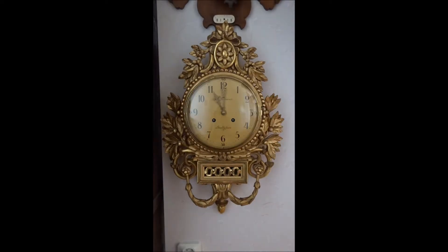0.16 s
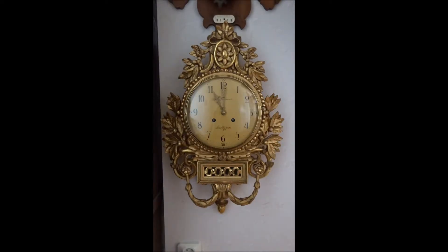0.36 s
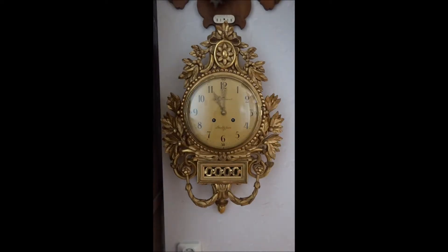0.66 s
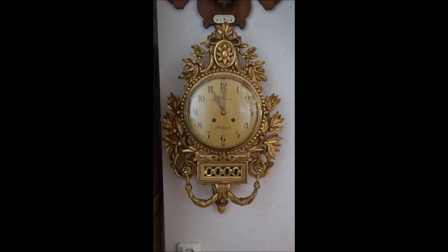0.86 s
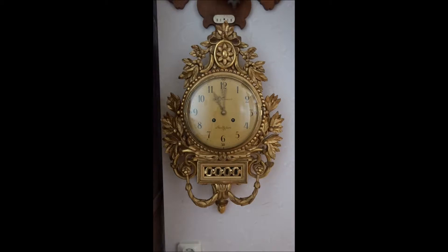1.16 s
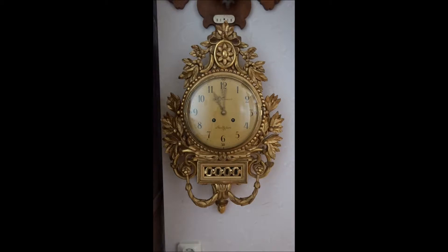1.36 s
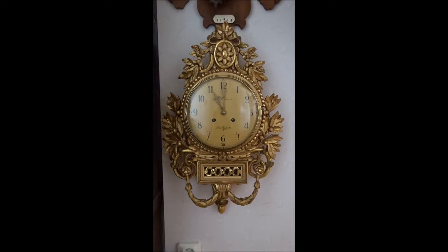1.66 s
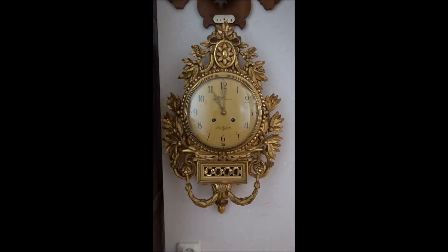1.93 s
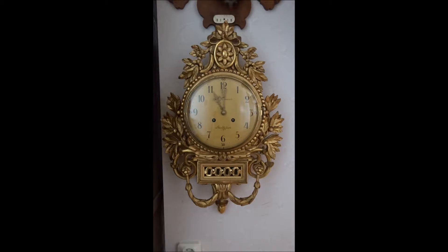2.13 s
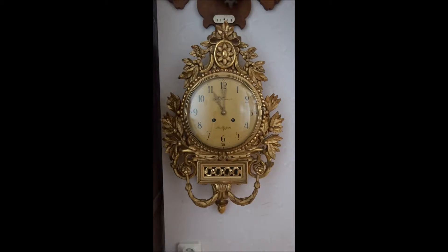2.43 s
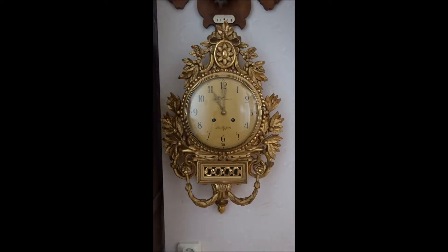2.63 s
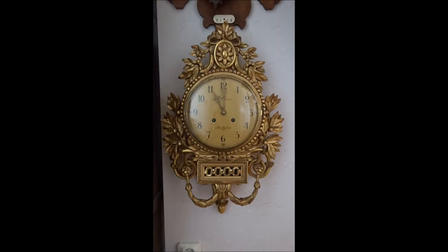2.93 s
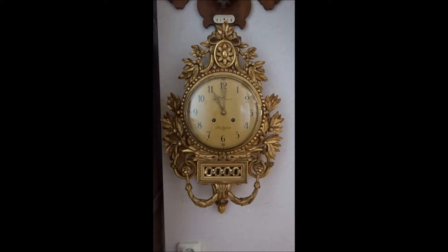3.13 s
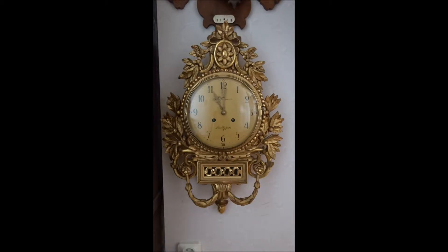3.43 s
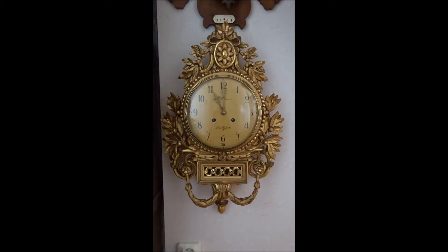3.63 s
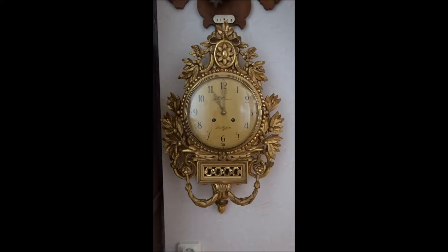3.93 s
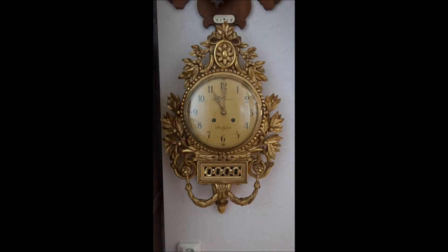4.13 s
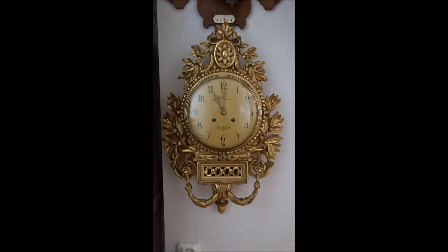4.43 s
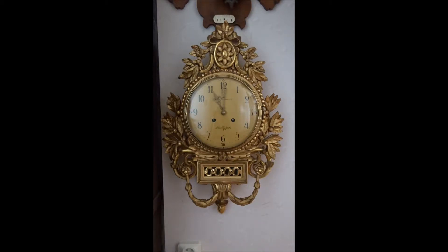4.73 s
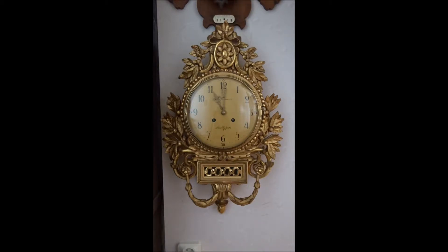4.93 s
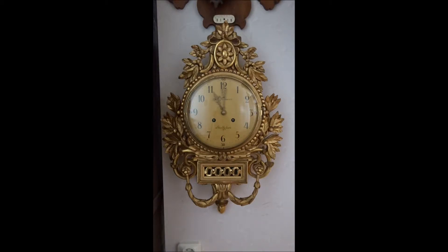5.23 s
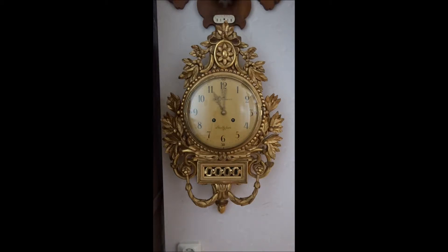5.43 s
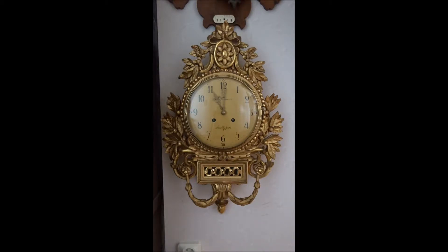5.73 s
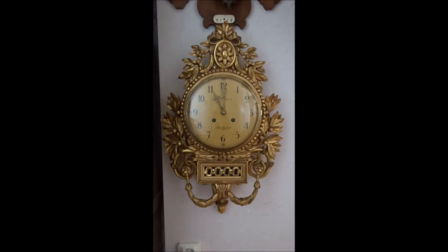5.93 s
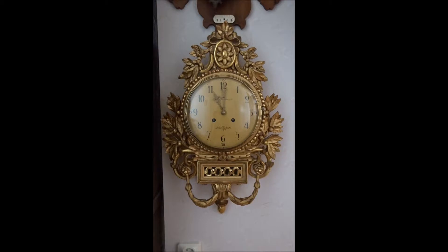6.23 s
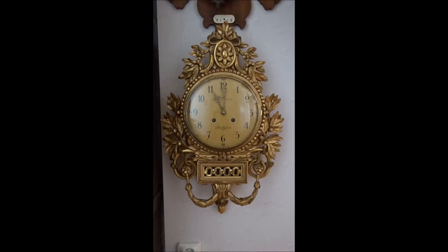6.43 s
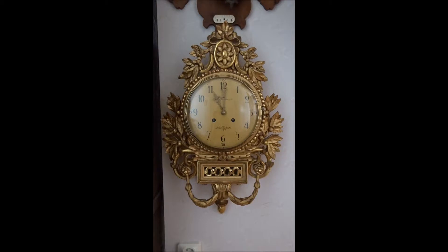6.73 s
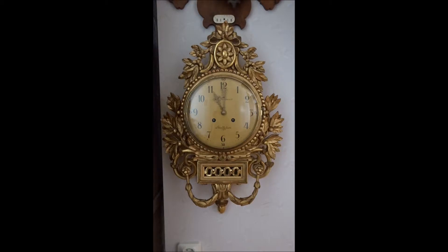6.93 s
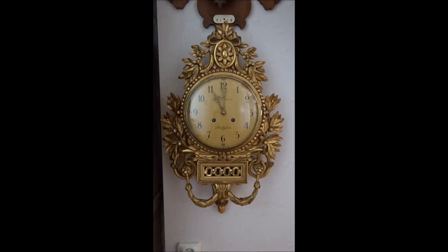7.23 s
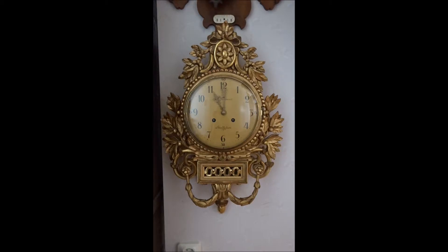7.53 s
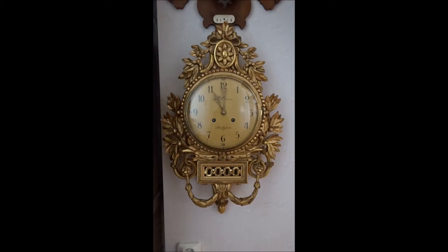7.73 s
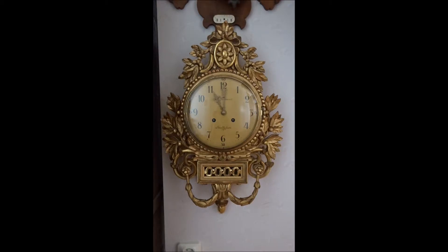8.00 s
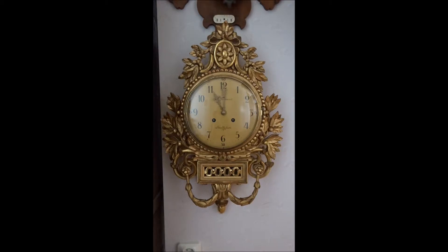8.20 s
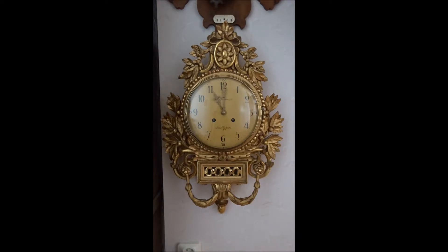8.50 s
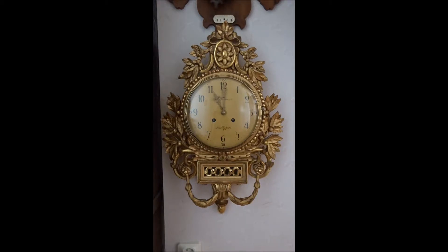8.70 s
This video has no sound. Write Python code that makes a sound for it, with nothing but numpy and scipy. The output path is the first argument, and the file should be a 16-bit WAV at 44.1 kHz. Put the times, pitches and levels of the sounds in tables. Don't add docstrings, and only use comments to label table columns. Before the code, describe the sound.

Very close to a spring-driven wall clock in a quiet room, after an instant of silence. At about 0.2 s the mechanism lets go with a double click and a woody clunk, and gears run on with a soft uneven whirr, rumble and fine hiss, dotted with tiny ticks and brief dragging murmurs. A faint, low distant engine drifts slowly upward and fades by about 5 s. The small bell is struck at about 1.9, 3.1, 4.3, 5.55, 6.8 and 8.0 s, each blow preceded a quarter second earlier by a light lifting click. The steel hammer chatters on the bell for roughly a tenth to a fifth of a second, with plate knocks and rattling loose parts, then the bell rings free: very high, bright and piercing over a steady lower hum, gently beating. Rings overlap; the final one is still fading near 9 s.

```python
import sys
import numpy as np
from scipy import signal
from scipy.fft import rfft, irfft, next_fast_len
from scipy.io import wavfile
from scipy.ndimage import uniform_filter1d

SR = 44100
rng = np.random.default_rng(int(sys.argv[2]) if len(sys.argv) > 2 else 0)


def field_ratio(decibels):
    return 10 ** (np.asarray(decibels, dtype=float) / 20)


def file_out(sig):
    cols = np.atleast_2d(sig).T
    lim = np.clip(cols, -1, 1)
    pcm = np.round(lim * 32767).astype(np.int16)
    wavfile.write(sys.argv[1], SR, pcm)


N = 390726


def at_hz(points, hz):
    points = np.array(points)
    return np.interp(np.log(hz), np.log(points[:, 0]), points[:, 1])


def smooth(x, seconds):
    r = np.exp(-1 / (seconds * SR))
    return signal.lfilter([1 - r], [1, -r], x)


def white():
    return rng.standard_normal((2, N))


def band(x, edges_hz, order):
    return signal.sosfilt(signal.butter(order, edges_hz, "band", fs=SR, output="sos"), x)


def ring(clicks, hz, t60):
    r, w = field_ratio(-60 / (t60 * SR)), 2 * np.pi * hz / SR
    return signal.lfilter([0, np.sin(w)], [1, -2 * r * np.cos(w), r * r], clicks)


# (frequency [Hz], likeness [0-1])
STEREO_LIKENESS = [(60, .83), (150, .7), (380, .5), (950, .35), (2380, .15), (5980, .68), (15000, .94)]


def coloured(pair, spectrum, mode_hz=40, modal=.0):
    size = next_fast_len(N)
    hz = np.maximum(np.arange(size // 2 + 1) * SR / size, 1)
    knots = np.arange(0, SR / 2, mode_hz)
    peaks_db = modal * np.interp(hz, knots, 10 * np.log10(rng.exponential(1, len(knots))))
    mid, side = rfft(pair, size) * field_ratio(at_hz(spectrum, hz) + peaks_db)
    alike = np.clip(at_hz(STEREO_LIKENESS, hz), 0, 1) ** .3
    stereo = np.sqrt(1 + alike) * mid + np.sqrt(1 - alike) * side * [[1], [-1]]
    out = irfft(stereo, size)[:, :N]
    return out / np.sqrt(np.mean(out ** 2))


def grainy(per_s, spread_db, share):
    sizes = field_ratio(spread_db * np.minimum(rng.exponential(1, (2, N)), 4))
    grains = (rng.random((2, N)) < per_s / SR) * sizes * rng.choice([-1, 1], (2, N))
    return share * grains / grains.std() + np.sqrt(1 - share ** 2) * white()


def bursts(rows, decays):
    env = np.zeros(N)
    for (s, peak_db), t60 in zip(rows, decays):
        at = round(s * SR)
        age = np.arange(len(env[at:at + SR // 2])) / SR
        env[at:at + SR // 2] += field_ratio(peak_db - 60 * age / max(t60, .005))
    return env


# (time [s], second partial [dB], main partial [dB], top partial [dB], tick [dB])
HAMMER_TOUCHES = [(1.908, 4, -1, -8.5, -19.5), (1.942, -4, -1, -3, -31), (1.98, 7, -0.5, -2, -56),
                  (3.131, 6, 5, -8.5, -20.5), (3.164, -3, 6, -4, -29), (3.203, 6.5, -7, -4, -26.5),
                  (4.344, 0, -3, -20, -23.5), (4.374, 5.5, -8, -21, -25.5), (4.419, 10, -11.5, -9.5, -24),
                  (4.458, 1, -10, -19, -32), (4.494, -2, -2, -7, -41), (4.507, -1.5, -1.5, 2, -30),
                  (5.5501, -3, -2, -5, -21.5), (5.585, 1, 0, 6.5, -39), (6.775, 11, 9, -25, -19.5),
                  (6.809, 13, 6, -25, -25), (6.849, 0, -13, -16, -20), (6.873, 9, 3, -14, -45),
                  (6.921, 7.5, -3, -2.5, -26.5), (6.961, 12, 3.5, 0.5, -56), (7.994, 8.5, -3, -25, -20.5),
                  (8.036, 10, 0, -26, -25), (8.077, 14, 4, -23, -37), (8.13, 5, 3, -30, -54)]


def blow_times():
    s = np.array(HAMMER_TOUCHES)[:, 0]
    return s[np.diff(s, prepend=0) > .5]


# (time [s], tick level [dB])
FREEING_TOUCHES = [(2.0123, -55), (3.2258, -52), (4.558, -41), (5.6174, -46), (6.9837, -31), (8.197, -25.5)]


def touch_ticks():
    return [(row[0], row[-1]) for row in HAMMER_TOUCHES] + list(FREEING_TOUCHES)


# (time [s], pitch [Hz], level [dB])
ENGINE_DRIFT = [(0.15, 50.3, -43), (0.22, 57.6, -44.5), (0.87, 54.8, -44), (1.38, 58.1, -47),
                (1.6, 61.2, -53), (2.63, 62.8, -51), (2.99, 64.2, -42.5), (3.4, 64.8, -56),
                (4.64, 67.1, -56), (5.3, 68.6, -61)]


def engine():
    s, hz, level_db = np.transpose(ENGINE_DRIFT)
    t = np.arange(N) / SR
    fade_db = 15 * np.maximum(t - s[-1], 0)
    phase = 2 * np.pi * np.cumsum(np.interp(t, s, hz)) / SR
    tone = np.sqrt(2) * field_ratio(np.interp(t, s, level_db) - fade_db) * np.sin(phase)
    rumble = coloured(white(), [(15, -35), (35, -15.5), (60, -14.5), (90, -10), (130, -33.5)])
    return tone + field_ratio(-55.0) * rumble


def swell(start, rise_s, t60):
    age = np.arange(N) / SR - start
    rise_db = -12 * (1 - age / max(rise_s, .001))
    fall_db = -60 * (age - rise_s) / max(t60, .02)
    return (age > 0) * field_ratio(np.where(age < rise_s, rise_db, fall_db))


# (time [s], tick level [dB], ringing part [Hz], strain on the train [dB])
HAMMER_LIFTS = [(1.6758, -37, 2960, 0), (2.914, -39.5, 2520, 3.5), (4.124, -38, 2370, 2),
                (5.334, -40, 4020, -18), (6.555, -38, 2220, -11), (7.7764, -38.5, 2380, 4.5)]
# (jolt [dB], rise [s], lurch [dB], t60 [s])
TRAIN_LURCHES = [(-8, 0.075, 0.5, 1), (-6.5, 0.078, -0.5, 0.77), (-16, 0.089, -2, 1.54),
                 (-8.5, 0.053, 1.5, 0.69), (-6.5, 0.076, 0.5, 0.72), (-10.5, 0.061, -2, 0.9)]
START_AT_S = 0.209


def train_efforts():
    t, blows = np.arange(N) / SR, blow_times()
    strain = 0
    for (s, *_, db), blow in zip(HAMMER_LIFTS, blows):
        strain = strain + field_ratio(db) * ((t > s) & (t < blow))
    jolt, lurch = 0, 0
    for s, (jolt_db, rise_s, lurch_db, t60) in zip(blows, TRAIN_LURCHES):
        jolt = jolt + field_ratio(jolt_db) * swell(s, 0.005, 0.27)
        lurch = lurch + field_ratio(lurch_db) * swell(s, rise_s, t60)
    clunk = swell(START_AT_S, 0.031, 0.54)
    return np.array([np.ones(N), smooth(strain, 0.0026), jolt, lurch, clunk])


# (time [s], level [dB])
BRISKNESS = [(0.4, -50), (0.68, -46), (1.2, -44.5), (1.69, -44), (1.86, -47.5), (2.85, -46.5), (3.2, -52.5),
             (3.72, -45), (4.369, -48), (4.521, -67), (4.9, -51.5), (5.53, -41.5), (6.02, -53),
             (6.85, -42.5), (7.01, -49), (8.85, -49)]
# (running [dB], under strain [dB], jolt [dB], lurch [dB], release clunk [dB])
TRAIN_NOISES = [
    (-46, -48, -27, -33.5, -36.5),
    (-46.5, -59, -28, -41, -45),
    (-57, -56.5, -68, -45, -44.5),
    (-53, -57.5, -25.5, -46.5, -46.5),
]
BRISKNESS_SHARE = [0.42, 0.44, 0.25, 0.31]
SLOW_START_DB = [2.5, -5.5, 2, -11.5]
SPIN_UP_S = 0.35


def train_levels():
    t, (s, run_db) = np.arange(N) / SR, np.transpose(BRISKNESS)
    swing_db = np.interp(t, s, run_db - run_db.mean())
    rest = np.exp(-np.maximum(t - START_AT_S, 0) / SPIN_UP_S)
    change_db = np.outer(BRISKNESS_SHARE, swing_db) + np.outer(SLOW_START_DB, rest)
    effort_power = field_ratio(2 * np.array(TRAIN_NOISES))
    power = effort_power @ train_efforts() ** 2
    power += effort_power[:, :1] * (field_ratio(2 * change_db) - 1)
    return 10 * np.log10(power)


# (frequency [Hz], level [dB per Hz])
CASE_RUMBLE = [(53, -31), (90, -7), (118, -5.5), (188, -6.5), (220, 0), (282, -5), (307, -3.5), (352, -2),
               (536, -14), (700, -15.5), (910, -26.5), (1540, -120)]
# (frequency [Hz], level [dB per Hz])
PLATE_WHIRR = [(320, -23.5), (550, -16), (640, -15), (790, -11.5), (935, -1), (1005, -3), (1078, -2),
               (1200, -11), (1380, -12), (1700, -25.5), (2210, -44), (3740, -120)]
# (frequency [Hz], level [dB per Hz])
TOOTH_RUSTLE = [(1000, -36), (1700, 1), (1890, 5.5), (2080, 1.5), (2610, -5.5), (2920, -6), (4010, -3.5),
                (4740, -15), (5000, -10), (6500, -40), (11000, -120)]
# (frequency [Hz], level [dB per Hz])
PIVOT_HISS = [(2820, -35.5), (4800, -9), (5150, -2), (5570, -6.5), (5950, -8), (6870, -4), (7630, -1),
              (9040, -6), (10800, -9), (11700, 1.5), (12600, -5), (13500, -6.5), (15800, -7)]


def gear_train():
    rumble_db, whirr_db, rustle_db, hiss_db = train_levels()
    rumble = coloured(grainy(150, 4.7, share=0.34), CASE_RUMBLE, mode_hz=22.02, modal=0.83)
    whirr = coloured(grainy(300, 6.4, share=0.3), PLATE_WHIRR, mode_hz=29.55, modal=1.0)
    rustle = coloured(grainy(1000, 3.4, share=0.38), TOOTH_RUSTLE, mode_hz=48.1, modal=0.35)
    hiss = coloured(grainy(1400, 3.4, share=0.61), PIVOT_HISS, mode_hz=70.0, modal=0.44)
    patches = field_ratio(1.65 * np.interp(np.arange(N), np.linspace(0, N, 60), rng.standard_normal(60)))
    out = field_ratio(rumble_db) * rumble + field_ratio(whirr_db) * whirr / patches
    return out + field_ratio(rustle_db + 4.0) * rustle * patches + field_ratio(hiss_db + 6.5) * hiss


def wandering(x, depth_db=3.0, fades_hz=5000):
    hz, _, z = signal.stft(x, SR, nperseg=1024)
    patch = uniform_filter1d(rng.standard_normal(z.shape[1:]), size=5, axis=0)
    patch = uniform_filter1d(patch, size=9, axis=1)
    gain = field_ratio(depth_db * patch / patch.std() / (1 + (hz[:, None] / fades_hz) ** 2) - 1.31)
    return signal.istft(z * gain, SR, nperseg=1024)[1][:, :N]


# (centre time [s], length [s],
# level [dB rms], pitch [Hz])
CASE_MURMURS = [(0.237, 0.077, -47, 900), (0.24, 0.056, -43.5, 2410), (0.302, .08, -47, 926),
                (0.342, 0.11, -52, 763), (0.445, 0.05, -50, 517), (0.755, 0.051, -45, 245),
                (0.854, .14, -51, 306), (1.136, 0.1, -51.5, 2060), (1.173, .12, -51, 1070),
                (2.266, 0.083, -51, 940), (2.306, 0.091, -49, 200), (2.547, .08, -50, 940),
                (2.935, 0.072, -49, 1043), (2.945, 0.057, -46, 304), (2.984, .07, -54, 2130),
                (3.054, 0.044, -44, 990), (3.419, 0.13, -52, 1270), (3.899, 0.086, -51, 236),
                (3.908, 0.089, -58, 2300), (4.155, 0.068, -48.5, 294), (4.26, 0.063, -60, 2340),
                (4.5, .08, -45, 343), (5.354, 0.055, -52, 324), (5.871, 0.051, -54, 350),
                (6.088, 0.024, -56, 3280), (6.314, 0.15, -56, 780), (6.587, 0.064, -53, 2280),
                (6.597, 0.043, -49, 280), (6.714, .1, -51.5, 242), (7.8, .07, -44, 249),
                (7.806, 0.069, -51, 865), (7.889, .07, -42, 225), (7.94, .06, -38.5, 218),
                (7.916, 0.048, -48, 940), (8.088, 0.057, -49, 1430), (8.102, .05, -41, 350),
                (6.89, 0.056, -51, 3300), (6.866, 0.023, -49, 3520), (5.631, .04, -47, 3620),
                (5.651, 0.15, -44.5, 344), (1.995, 0.059, -48, 3500), (0.477, 0.11, -59, 1610),
                (0.559, 0.065, -58, 1360), (1.022, .08, -51, 940), (6.245, 0.29, -60, 1000),
                (5.677, .12, -54, 70), (6.923, 0.122, -54, 75),
                (.236, 0.029, -41, 245), (0.244, .028, -32.5, 950), (0.262, .022, -45, 328),
                  (0.22, .014, -42, 910), (0.278, 0.01, -45, 930), (0.347, 0.14, -58, 557)]
MURMUR_WIDTH = 0.071


def murmurs():
    out = np.zeros((2, N))
    for s, length, level_db, hz in CASE_MURMURS:
        edges = [hz / (1 + MURMUR_WIDTH), hz * (1 + MURMUR_WIDTH)]
        noise = band(rng.standard_normal((2, SR // 2)), edges, 2)
        mid, side = noise[:, -int(1.5 * length * SR):]
        puff = (mid + 0.3 * side * [[1], [-1]]) * np.hanning(len(mid))
        at = int(s * SR) - len(mid) // 2
        out[:, at:at + len(mid)] += field_ratio(level_db) * puff / puff.std()
    return out


# (frequency [Hz], width [Hz], level [dB])
CASE_MODES = [(242, 28, -3), (974, 230, -1), (2410, 4, -26.5), (3850, 45, -49), (5390, 35, -11),
              (6420, 46, -32.5), (7800, 19, -60), (9720, 64, -39), (11100, 77, -10.5), (12600, 25, -25),
              (12150, 210, -3.5), (15400, 89, -14)]
# (time [s], peak level [dB], ringing part [Hz])
TRAIN_RELEASES = [
    (0.212, -35.5, 2490),
    (0.228, -36.5, 2410),
]
# (time [s], peak level [dB], ringing part [Hz])
ARM_CATCHES = [(1.9787, -30.5, 3390), (3.214, -26.5, 3570), (4.413, -26, 3980), (4.442, -24, 3650),
               (5.6214, -29, 3580), (6.846, -20, 3930), (8.064, -24.5, 3970)]
# (time [s], peak level [dB], ringing part [Hz])
CLEAR_TICKS = [(0.5322, -37.5, 3300), (1.516, -38, 3440), (2.383, -38, 3410), (5.226, -40, 3400),
               (7.0763, -36, 3440)]
# (time [s], peak level [dB], ringing part [Hz])
SOFT_TICKS = [(2.1426, -37, 2190), (4.2345, -41, 2300), (6.349, -45, 2200), (6.6712, -37.5, 2110),
              (7.5797, -36.5, 2080), (8.52, -38, 2160)]
# (time [s], peak level [dB], ringing part [Hz])
CASE_KNOCKS = [(0.438, -42, 2970), (0.995, -38.5, 2630), (1.828, -41, 4040), (7.7964, -52, 2590),
               (7.931, -43, 2340)]
# (lows against the peak [dB], highs against the peak [dB], t60 [s])
CONTACT_KINDS = [
    (2, 4.5, 0.14),
    (2.5, 2.5, 0.27),
    (-7, -21, 0.064),
    (-47, -19, 0.077),
    (-4, -11, 0.12),
    (2, -4, 0.11),
]


def case_ticks():
    hz = np.geomspace(150, 16500, 400)
    body = field_ratio(-17.0) + sum(field_ratio(db) / (1 + (2 * (hz - peak) / width) ** 2) for peak, width, db in CASE_MODES)
    sound = coloured(white(), np.c_[hz, 20 * np.log10(body)], modal=0.083)
    groups = [HAMMER_LIFTS, TRAIN_RELEASES, ARM_CATCHES, CLEAR_TICKS, SOFT_TICKS, CASE_KNOCKS]
    contacts = [(*row[:3], *kind) for rows, kind in zip(groups, CONTACT_KINDS) for row in rows]
    s, peak_db, part_hz, low_db, high_db, t60 = np.transpose(contacts)
    bands = [((150, 1700), low_db - 0.5, 1.3), ((1700, 5500), -8, 1.5), ((5500, 16000), high_db - 0.5, .7)]
    out = 0
    for edges_hz, level_db, longer in bands:
        part = band(sound, edges_hz, 3)
        env = smooth(bursts(zip(s, peak_db + level_db), t60 * longer), 0.002)
        out = out + part / part.std() * env
    age = np.arange(SR // 4) / SR
    for at, level_db, centre_hz, decay in zip((s * SR).astype(int), peak_db, part_hz, t60):
        steel = band(rng.standard_normal(len(age)), [centre_hz / 1.09, centre_hz * 1.11], 2)
        env = field_ratio(level_db - 9.5 - 60 * age / (1.4 * decay))
        out[:, at:at + len(age)] += steel / steel.std() * env
    return out


# (frequency [Hz], level [dB per Hz])
LOOSE_PARTS = [(2000, -29.5), (2800, -5.5), (3600, 0), (4400, -2), (5300, 2), (6500, -11), (9600, 1.5),
               (11000, -4), (14000, -8.5)]
SHIVER_DB = [-44, -43, -47, -45, -42, -43]
SHIVER_HOLD_S, SHIVER_T60_S = 0.12, .45


def rattle():
    age = np.arange(N) / SR - blow_times()[:, None]
    decay = field_ratio(-60 * np.maximum(age - SHIVER_HOLD_S, 0) / SHIVER_T60_S)
    env = field_ratio(np.array(SHIVER_DB)) @ ((age > 0) * decay)
    return env * coloured(grainy(1500, 4.0, share=0.77), LOOSE_PARTS, mode_hz=87.0, modal=0.81)


# (frequency [Hz], level [dB], t60 [s])
PLATE_MODES = [(930, -33, 0.051), (1087, -35.5, 0.047), (1300, -40, 0.033)]
# (delay [s], level [dB])
ARM_KNOCKS = [
    (.003, -1),
    (.012, -13),
    (.021, -6),
]


def plate_knocks():
    clicks = np.full(N, 1e-18)
    for wait, db in ARM_KNOCKS:
        clicks[((blow_times() + wait) * SR).astype(int)] = field_ratio(db)
    return sum(field_ratio(level_db) * ring(clicks, hz, t60) for hz, level_db, t60 in PLATE_MODES)


# (frequency [Hz], level [dB], t60 [s])
FAINT_MODES = [(940, -34, 0.16), (79, -42, 0.99), (3820, -50, 0.14), (4780, -27.5, 0.071),
               (6730, -31, 0.028), (4860, -54.5, 5.2), (12800, -46, .35), (1073, -49, 0.12)]


def faint_modes():
    at = (blow_times() * SR).astype(int)
    out = np.zeros(N)
    for hz, level_db, t60 in FAINT_MODES:
        clicks = np.full(N, 1e-18)
        clicks[at] = field_ratio(level_db + rng.normal(0, 0.59, len(at)))
        out += ring(clicks, hz, t60)
    return out


# (frequency [Hz], level against the tick [dB], t60 [s])
HAMMER_MODES = [(3400, -36, .04), (3900, -20, 0.064), (5230, -6.5, 0.015), (6100, -24, 0.033),
                (6650, -5.5, 0.033), (9760, -13, 0.018), (13200, 2.5, 0.016)]
REBOUND_RING_DB = -2.5


def hammer_ring():
    s, tick_db = np.transpose(touch_ticks())
    tick_db = tick_db + REBOUND_RING_DB * ~np.isin(s, blow_times())
    out = np.zeros((2, N))
    for hz, level_db, t60 in HAMMER_MODES:
        clicks = np.full((2, N), 1e-18)
        clicks[:, (s * SR).astype(int)] = field_ratio(tick_db + level_db + rng.normal(0, 2.3, (2, len(s))))
        out += ring(clicks, hz, t60)
    return out


REBOUND_CUT_HZ = 4300


def hammer_ticks():
    rows = touch_ticks()
    bright = coloured(white(), [(1500, -35.5), (3000, -24.5), (4300, 1.5), (5200, 8.0), (6200, -4.0),
                                (9500, 5.5), (14000, -32.0), (16500, -24.5)])
    crack = bursts(rows, [.02] * len(rows)) + bursts(rows, [.4] * len(rows)) * field_ratio(-16.5)
    fresh = np.minimum(bursts([(s, 30) for s in blow_times()], [.09] * 6), 1)
    thin = signal.sosfilt(signal.butter(3, REBOUND_CUT_HZ, "high", fs=SR, output="sos"), bright)
    bright = fresh * bright + (1 - fresh) * thin
    plate = coloured(white(), [(600, -46.5), (900, 7.5), (1000, -9.5), (1150, -7), (1600, -12.5)])
    return bright * crack + plate * bursts(rows, [.12] * len(rows)) * field_ratio(-12.0)


# (lower mode [Hz], upper mode [Hz], t60 [s], lower left-right [dB],
# upper left-right [dB], lower left lead [rad], upper left lead [rad])
BELL_PARTIALS = [
    (1921.12, 1923.31, 60, -.6, -.3, .11, .13),
    (4733.81, 4738.74, 7, -.5, -11.5, -.1, 1.52),
    (8251.82, 8254.16, 1.67, -.6, .7, .14, .08),
    (12341.47, 12343.72, .58, 1.6, 0, .33, .3),
]
# (lower mode [dB], upper mode [dB], wait for the first swell [s])
FREE_HUM = [(-28, -35.5, 0.17), (-26, -37, 0.18), (-34, -33.5, 0.441), (-29, -33, 0.17),
            (-28.5, -40.5, 0.035), (-28.5, -34, 0.077)]
# (lower mode [dB], upper mode [dB], wait [s],
# share of the upper mode the room still holds [ratio], its phase [rad])
FREE_SECOND = [(-41, -29.5, 0.13, .3, 2), (-44.5, -31.5, 0.17, 1.85, 0.1), (-38.5, -34, 0.013, 0.97, 2),
               (-37.5, -28, 0.18, .45, 2.8), (-48.4, -38, 0.18, 0.87, 0), (-43, -37.5, 0.039, 1.05, 1.5)]
# (lower mode [dB], upper mode [dB], wait [s])
FREE_MAIN = [(-1.5, -12, .16), (-2.5, -10.5, 0.17), (-6, -18, 0.33), (2, -13.5, 0.22), (-24, -16, 0.36),
             (-4.5, -14.5, 0.12)]
# (lower mode [dB], upper mode [dB], wait [s])
FREE_TOP = [(-10.5, -17, 0.16), (-16.5, -13.5, 0.26), (-19.5, -24.5, 0.23), (-10.5, -11, 0.206),
            (-11, -17, 0.22), (-11, -17.5, 0.25)]
CHATTER_HUM_DB = [-5.5, -1.5, -1, 0, 0.5, 2]
LOWER_T60_RATIO = [0.77, 1.3, 1.06, 0.94]
ROOM_PART = [0.16, 0.59, 0.38, 0.16]
ROOM_BUILD_S = [0.016, 0.044, 0.016, .02]
WALL_ECHO_T60_S = [.5, .8, 0.76, .5]
HUM_AT_BLOW_DB, HUM_SETTLES_S = 5.5, 0.015
HELD_T60_S = 0.69
BLOW_LEANS_DB, LEAN_S = 17.5, 0.049


def bell():
    t, out = np.arange(N) / SR, np.zeros((2, N))
    touches, blows, freed = np.array(HAMMER_TOUCHES), blow_times(), np.array(FREEING_TOUCHES)[:, 0]
    touch_s = touches[:, 0]
    touch_strike = np.searchsorted(blows, touch_s, "right") - 1
    late = touch_s - blows[touch_strike]
    hum_db = HUM_AT_BLOW_DB * np.exp(-late / HUM_SETTLES_S) + np.take(CHATTER_HUM_DB, touch_strike)
    touch_db = [hum_db, *touches[:, 1:4].T]
    strike = np.maximum(np.searchsorted(blows, t, "right") - 1, 0)
    scatter = smooth(smooth(rng.standard_normal(N) + 1j * rng.standard_normal(N), 0.0005), 0.0005)
    scatter = scatter / scatter.std()
    stem = 1 + .02 * np.cos(2 * np.pi * 127 * t)
    # build-up in s, early extra of the upper mode, wall echo
    build_s, early, echo = [0.012, 0.0045, 0.0011, 0.00046], [0.0026, 0.069, 0.31, 0.0075], [.25, .6, .11, .45]
    for k, (partial, rings) in enumerate(zip(BELL_PARTIALS, [FREE_HUM, FREE_SECOND, FREE_MAIN, FREE_TOP])):
        low_hz, high_hz, t60, low_pan_db, high_pan_db, low_lead, high_lead = partial
        s, low_db, high_db, wait, *held = np.c_[freed, rings][strike].T
        free_s = np.maximum(t - s, 0)
        held = held[0] * np.exp(1j * held[1]) if held else 0
        held = held * (t >= s) * field_ratio(-60 * free_s / HELD_T60_S)
        steps = [(0, -200)] + [(x, 0) for x in freed] + list(zip(touch_s, touch_db[k]))
        steps = np.array(sorted(steps))
        step = np.searchsorted(steps[:, 0], t, "right") - 1
        since = t - steps[step, 0]
        jolt = np.exp(1j * np.cumsum(rng.normal(0, 0.56, len(steps))))[step]
        jolt = jolt + echo[k] * np.roll(scatter, k * SR) * field_ratio(-60 * since / WALL_ECHO_T60_S[k])
        fade_db = -60 * np.maximum(t - s, -.5) / t60
        beat = np.exp(-2j * np.pi * (high_hz - low_hz) * (s + wait))
        beat = beat * (1 + held + early[k] * field_ratio(-60 * free_s / 1.8))
        lean_db = (k == 1) * BLOW_LEANS_DB * np.exp(-abs(t - blows[strike]) / LEAN_S)
        lower = (low_hz, low_db + fade_db / LOWER_T60_RATIO[k], 1, low_pan_db, low_lead)
        upper = (high_hz, high_db + fade_db, beat, high_pan_db + lean_db, high_lead)
        for hz, level_db, turn, pan_db, lead in [lower, upper]:
            push = smooth(field_ratio(level_db + steps[step, 1] - 1.04) * jolt * turn, build_s[k])
            heard = (0.92 - ROOM_PART[k]) * push + ROOM_PART[k] * smooth(push, ROOM_BUILD_S[k])
            swing = heard * stem * np.exp(2j * np.pi * hz * t)
            side = field_ratio(pan_db / 2) * np.exp(.5j * lead)
            out += np.real([swing * side, swing / side])
    return out


def scene():
    works = engine() + wandering(gear_train()) + murmurs() + case_ticks() + rattle()
    works = works + plate_knocks() + faint_modes() + hammer_ring() + hammer_ticks()
    return bell() + works * field_ratio(np.array([[.4], [-.4]]))


def limited(x, top_db=-1.0, release_db_s=25):
    over = np.maximum(20 * np.log10(abs(x).max(0) + 1e-9) - top_db, 0)
    ramp = release_db_s * np.arange(N) / SR
    held = np.maximum.accumulate(over + ramp) - ramp
    ahead = np.roll(smooth(held, .002), -SR // 300)
    return np.clip(x * field_ratio(-ahead), -1, 1)


def masked(x, under_db=30, per_khz_db=6.5, reach_db=23, below_db=40, ragged_db=4.5):
    z = signal.stft(x, SR, nperseg=1024)[2][:, :512]
    power = (abs(z) ** 2).mean(0).reshape(64, 8, -1).sum(1)
    level = 10 * np.log10(power + 1e-20)
    khz = (np.arange(64)[:, None] - np.arange(64)) * 8 * SR / 1024e3
    shadow = -under_db - np.where(khz > 0, np.minimum(per_khz_db * khz, reach_db), -below_db * khz)
    shadow[:, khz[:, 0] < 7] = -200
    ragged = ragged_db * 2 * uniform_filter1d(rng.standard_normal(level.shape), size=4)
    keep = level + ragged > (level[None] + shadow[:, :, None]).max(1)
    z = np.pad(z * np.repeat(keep, 8, axis=0), [(0, 0), (0, 1), (0, 0)])
    return signal.istft(z, SR, nperseg=1024)[1][:, :N]


def low_pass(x):
    return signal.sosfilt(signal.butter(12, 17120, fs=SR, output="sos"), x)


def record(dry):
    top_cut = signal.cheby2(12, 50, 16100, fs=SR, output="sos")
    cut = signal.sosfilt(top_cut, limited(dry))
    started = np.arange(N) >= .1425 * SR
    return low_pass(masked(cut) * started)


dry = scene()
out = record(dry)
file_out(out)
```